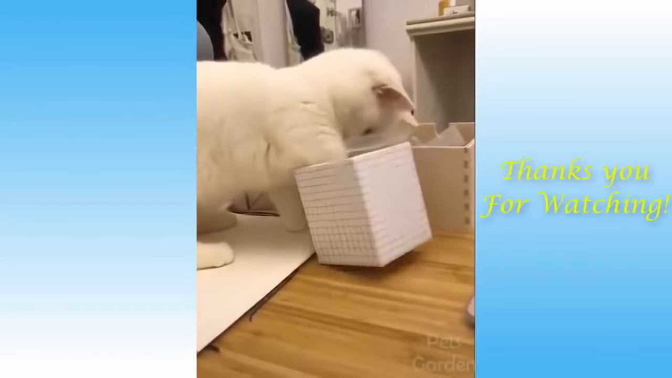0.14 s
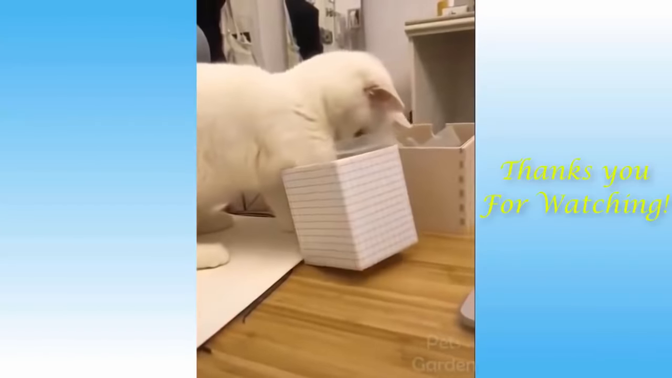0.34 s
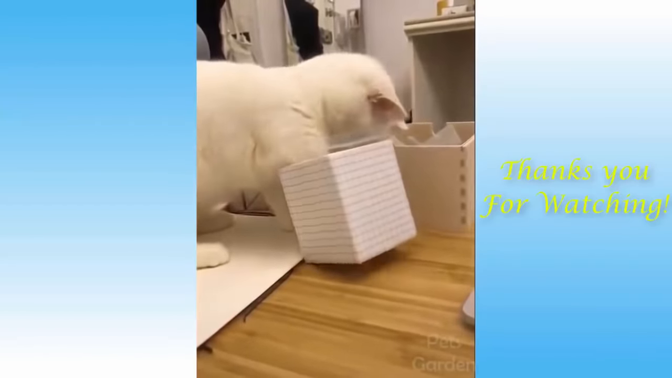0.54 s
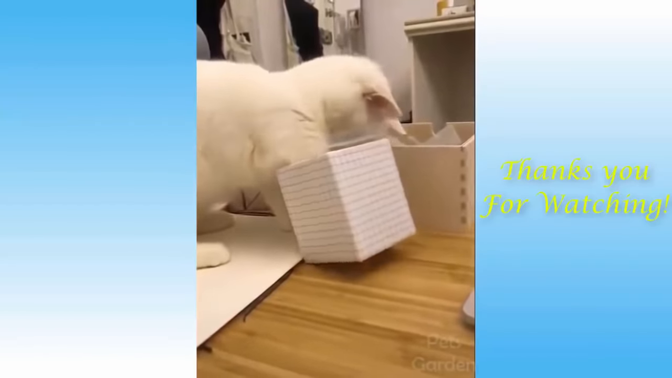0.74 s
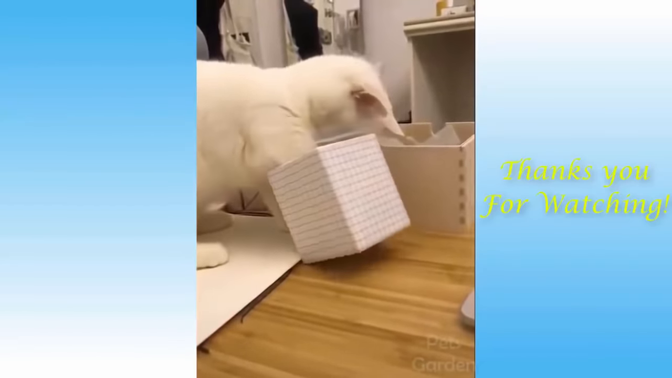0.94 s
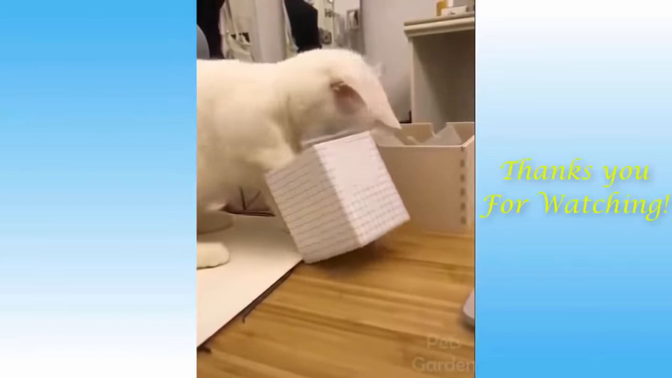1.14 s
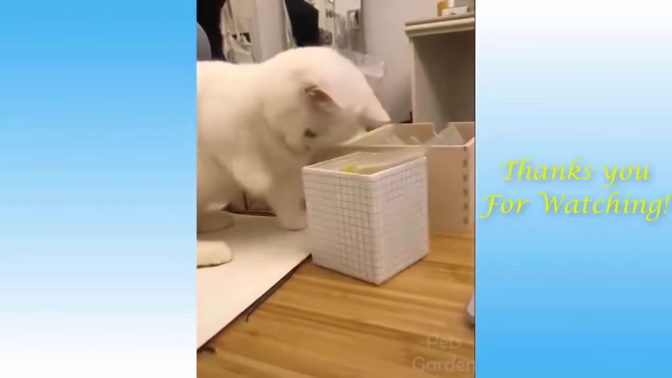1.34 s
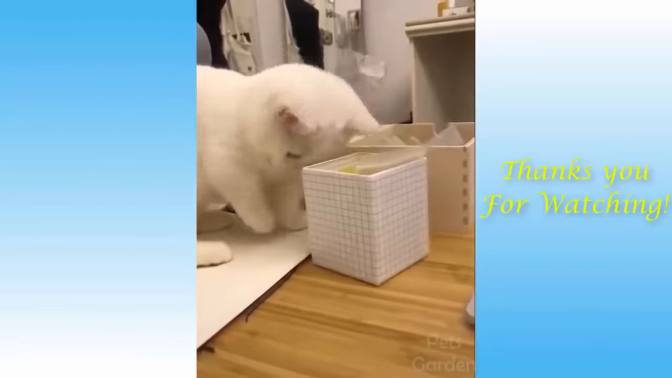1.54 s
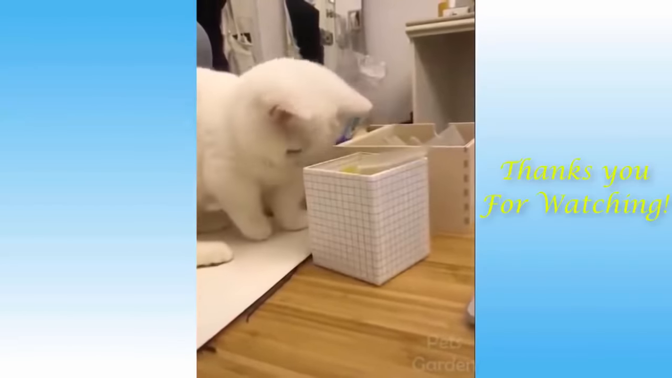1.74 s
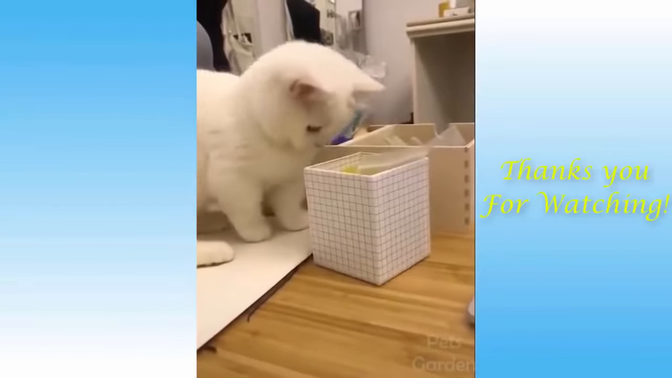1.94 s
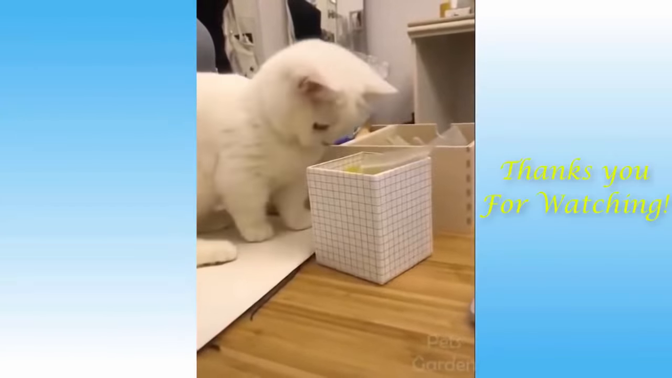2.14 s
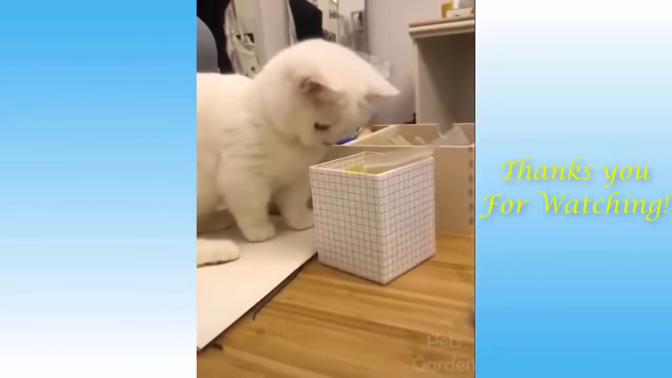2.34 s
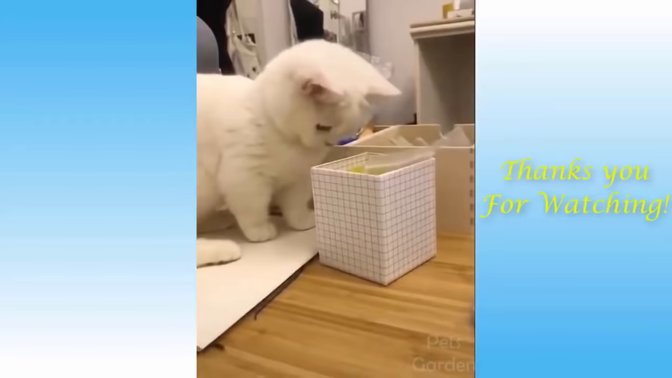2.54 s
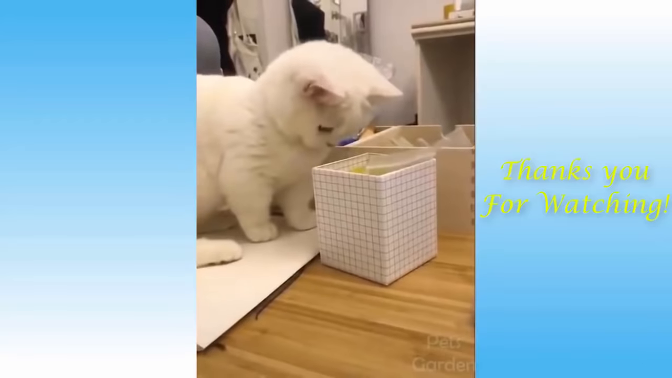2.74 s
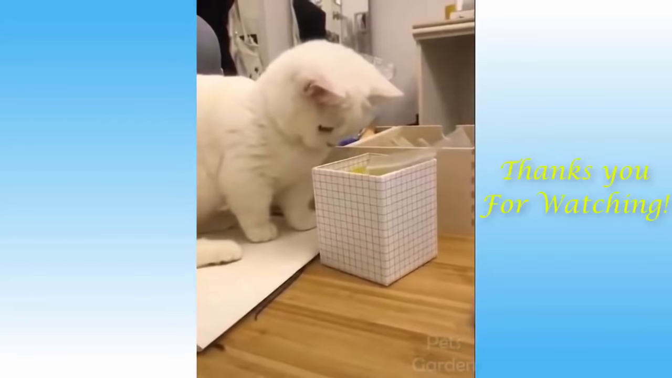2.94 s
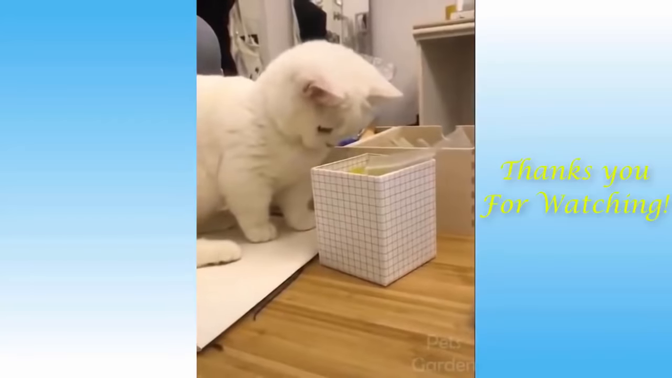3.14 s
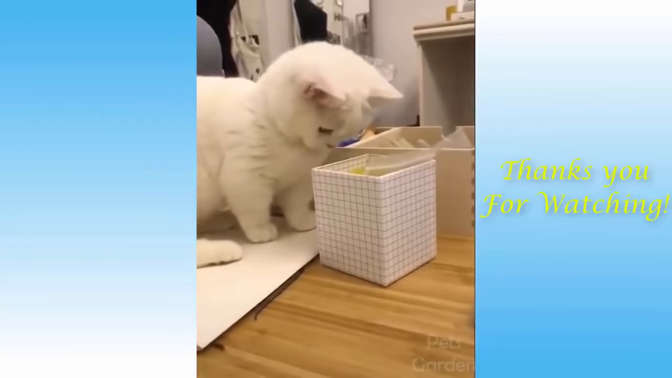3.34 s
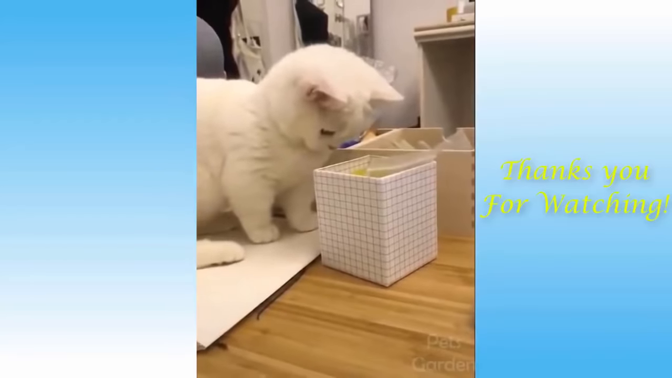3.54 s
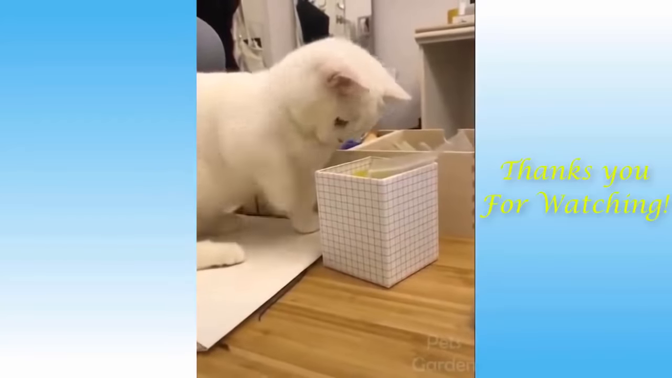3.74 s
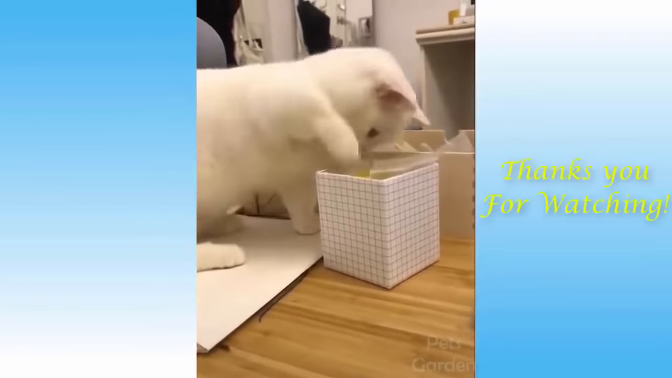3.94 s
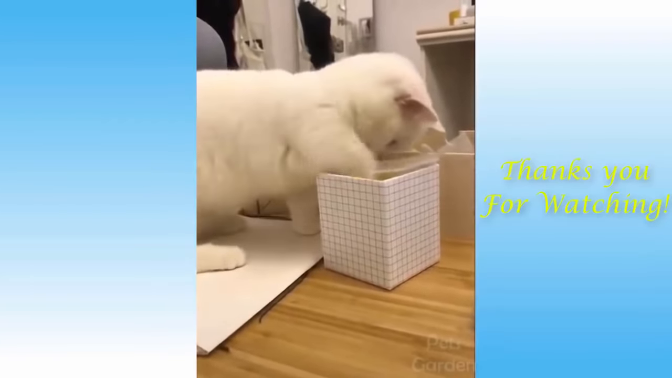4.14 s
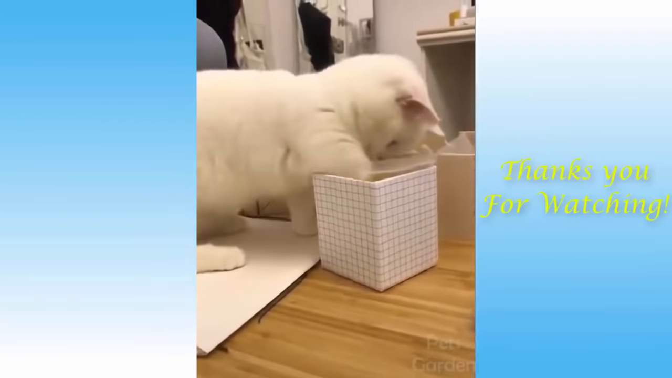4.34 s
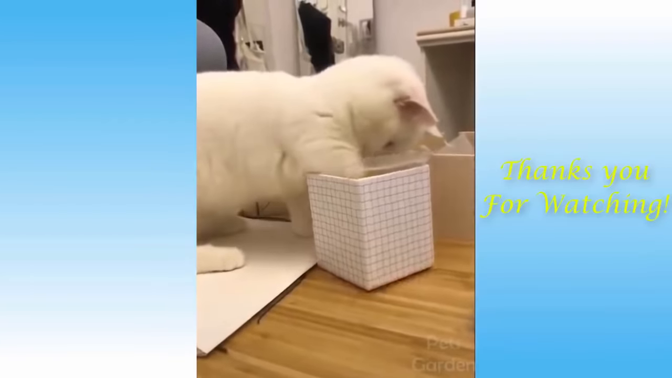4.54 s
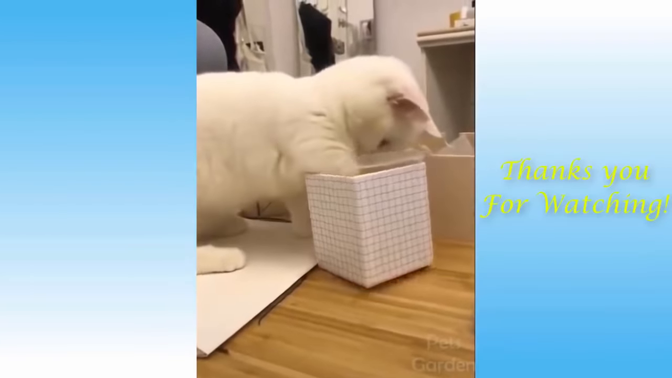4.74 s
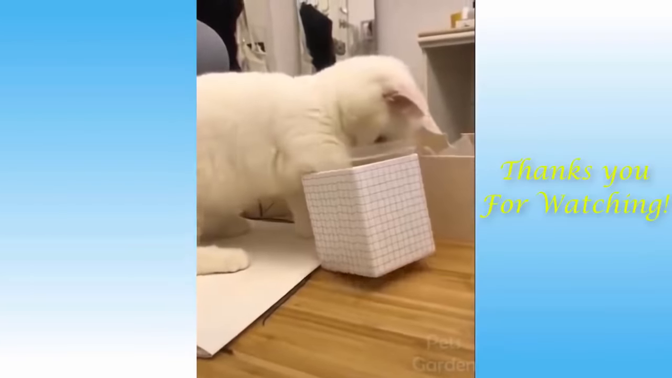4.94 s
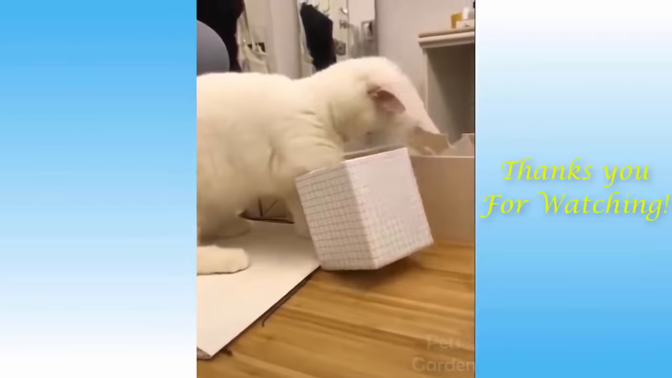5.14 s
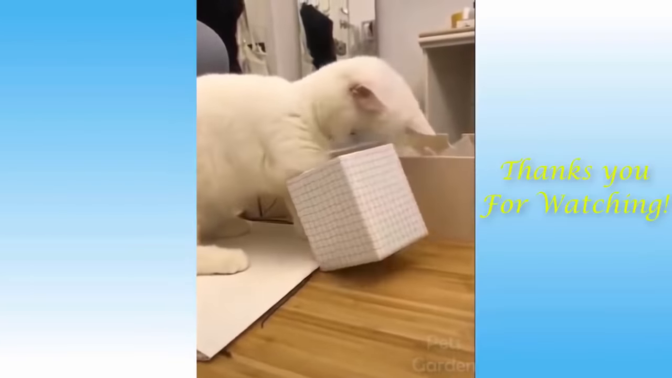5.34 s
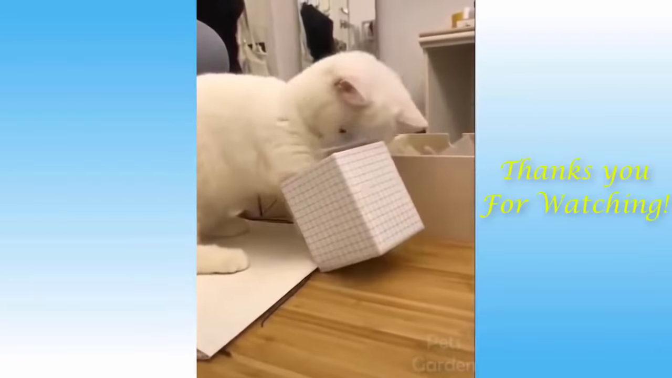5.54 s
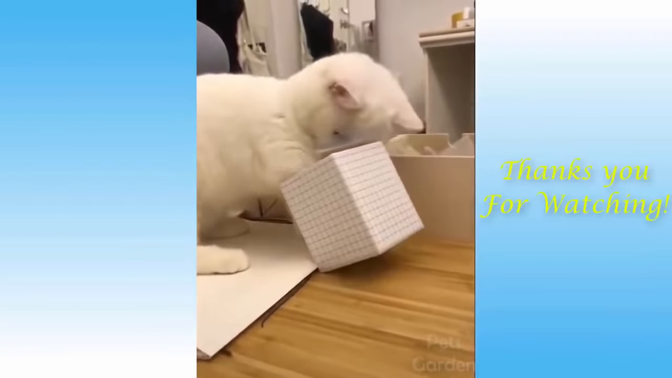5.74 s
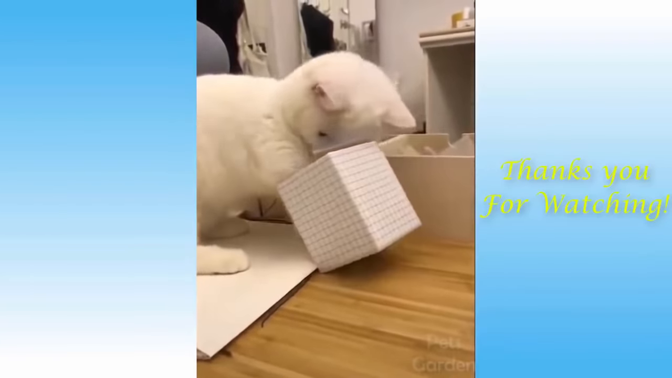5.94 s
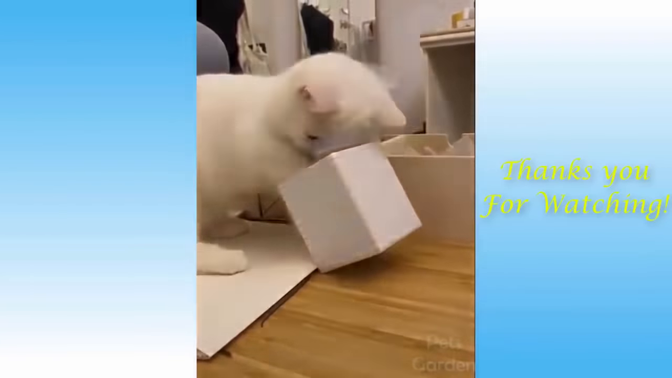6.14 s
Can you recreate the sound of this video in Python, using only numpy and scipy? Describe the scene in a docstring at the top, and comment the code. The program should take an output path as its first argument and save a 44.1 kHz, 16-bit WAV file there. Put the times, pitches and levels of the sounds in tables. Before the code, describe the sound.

A cat's paw scratches inside a small cardboard box, which drops with a knock and a brief rattle, then quiet, then more scraping indoors.

```python
"""Cat in a cardboard box

A cat paws inside a small cardboard box on a wooden table; the tipped box drops back with a knock.
Claws and fur scrape, tick and rasp: noisy forces ring the modes of the card, or glide as narrow noise.
A loose toy rattles inside after the drop; toy and table are struck banks of modes, with a room echo.
A quiet room of banded noise with an appliance hum lies underneath and fades away towards the end."""
import sys
import numpy as np
from scipy import signal
from scipy.io import wavfile

SR = 44100
rng = np.random.default_rng(int(sys.argv[2]) if len(sys.argv) > 2 else 0)


def wrap_up_sound(samples):
    """Save the sound to the file named by the first command line argument, as 16-bit audio."""
    columns = np.atleast_2d(samples).T
    # keep every value between -1 and 1, then stretch to whole-number steps
    tamed = np.clip(columns, -1, 1)
    steps = np.round(tamed * 32767).astype(np.int16)
    wavfile.write(sys.argv[1], SR, steps)


N = 273270


def from_db(db):
    """Gain of a dB value."""
    return 10 ** (np.asarray(db) / 20)


def rms_one(x):
    """Scale to rms 1."""
    return x / np.sqrt(np.mean(x ** 2) + 1e-20)


def in_time(rows):
    """Curve columns, one value per sample."""
    s, *columns = np.transpose(rows)
    return [np.interp(np.arange(N) / SR, s, c) for c in columns]


def drift(rate_hz):
    """Slow random curve of spread 1: noise at SR / 40 through two equal poles at rate_hz."""
    r = np.exp(-2 * np.pi * rate_hz * 40 / SR)
    noise = rng.standard_normal(N // 40 + 2002)
    slow = signal.lfilter([1], [1, -2 * r, r * r], noise)[2000:]  # settled part
    return np.interp(np.arange(N) / 40, np.arange(len(slow)), rms_one(slow))


def band(x, low_hz, high_hz):
    """Band-pass."""
    return signal.sosfilt(signal.butter(2, [low_hz, high_hz], "band", fs=SR, output="sos"), x)


def ring(push, hz, t60_s):
    """A unit click sets a wave of height 1 ringing; small panels radiate nothing far below their pitch."""
    r = from_db(-60 / (t60_s * SR))
    w = 2 * np.pi * hz / SR
    return signal.lfilter([.5, 0, -.5], [1, -2 * r * np.cos(w), r * r], push + 1e-18)


def body(push, modes):
    """All modes of one object, signs alternating."""
    return sum((-1) ** k * from_db(db) * ring(push, hz, t60_s) for k, (hz, db, t60_s) in enumerate(modes))


# Strokes of the paw on the card. Each row: peak in s, relative wall level in dB, swell in s per 20 dB,
# fade in s per 20 dB, hollowness in dB, hollow pitch in Hz, edge in dB, crackle in dB.
PAW_STROKES = [(.03, -45.5, 7, 0.1, -4, 930, -3.5, -5), (0.113, -48.5, 0.1, -0.25, -5, 970, 7, -24.5),
               (.205, -50.5, 0.13, 0.46, -5.5, 870, -1, -18), (.34, -57, 0.4, 0.15, 3, 1150, -24, -16),
               (0.441, -45, 0.07, 0.16, -4, 1240, -5.5, -27), (.55, -51, 0.7, 0.25, 2, 880, -1.5, -9),
               (0.647, -54.5, 0.06, -0.01, 11.5, 1070, 2, 0), (0.741, -54, 0.03, -0.02, 0, 1200, -8, -17),
               (.79, -50.5, -0.15, -0.13, 6, 1450, -2, -1), (0.971, -63.5, 0, 0.02, 9, 760, 11, 7),
               (1.111, -45, -0.0752, -0.02, -4.5, 1300, -1, -12), (1.17, -55, -0.3, -2.3, 7, 1000, 5, -8),
               (1.258, -57, 0.12, 0.16, 10.5, 980, -7, -17),
               (1.328, -61.5, 0.64, 0.43, 1.5, 740, -3.5, -6.5), (1.481, -51, 0, 0.02, 5, 1100, 7, -9),
               (1.547, -45.5, -0.05, 0.1456, 8, 1440, -7, -7.5),
               (1.586, -34.5, 0.0245, 0.1181, 5, 1090, -5.5, -9.5),
               (1.62, -27, 0.0611, 0.05, 3.5, 760, 1, -14),
               (1.642, -32.5, 0.0761, 0.1318, 2.5, 804, -2, -15.5),
               (1.71, -43, 0.25, 0.2, -4, 840, -9, -15.5), (1.85, -44.5, 0.19, 0.19, 0, 1120, -4, -10.5),
               (2.02, -59.5, 0, 0.07, 3, 1178, -7, -32), (2.198, -65, 0.4, 0.32, 7, 1120, 5, -6),
               (2.732, -66.5, 0.4, 0.33, 2.5, 1290, -5.5, -14),
               (3.249, -57.5, -0.03, 0.32, 3.5, 840, -8, -13), (3.999, -57, 0.05, 0, 4.5, 1080, -8.5, -22),
               (4.5, -66.5, -0.0349, -0.5, 13, 593, 6, 11), (4.686, -44, 0.01, 0.16, 9, 1050, -4.5, -10),
               (4.73, -46, 0.0362, -0.06, -7.5, 1100, -8, -17), (4.9, -55, 0.35, -0.6, 0, 1040, -8, -11.5),
               (5.003, -53, 0.01, -0.2, 11, 865, 9, 27), (5.115, -62, 0, 1.4, -6, 1300, 4, 12),
               (5.06, -47.5, 0.18, 0.1, -3, 1110, -6, -13), (5.174, -38, 0.15, 0.23, -3, 1570, -13, -24),
               (5.26, -43, 0.2, 0.08, -9, 1340, -4, -19), (5.442, -47.5, -0.14, 0.38, -4.5, 1505, -11, -22),
               (5.58, -61.5, 0.32, 0.5, -18, 1233, 2, -27), (5.842, -52, -0.36, 0.28, -7, 1004, -7, -16.5),
               (5.99, -61, 0.2, 0.34, 4.5, 910, -1, -18), (6.085, -53, -0.68, 0, -6, 795, -1.5, 8),
               (6.15, -70.5, -2, 0, -11, 710, 0.5, -6)]
# Fur brushing between strokes: relative wall level in dB, hollowness in dB, hollow pitch in Hz,
# edge in dB, crackle in dB.
FUR_REST = (-77, 7.5, 880.5, -6.5, -11)


def strokes():
    """Strokes swell and fade evenly in dB; where they overlap, powers add and colours blend."""
    t = np.arange(N) / SR
    rest_db, *rest_shade = FUR_REST
    total = np.full(N, from_db(rest_db) ** 2)
    colour = total * np.c_[rest_shade]
    for s, level_db, swell_s, fade_s, *shade in PAW_STROKES:
        before = (s - t) / max(swell_s, .003)  # 3 ms at the least
        after = (t - s) / max(fade_s, .003)
        power = from_db(level_db - 20 * np.maximum(before, after)) ** 2
        total = total + power
        colour = colour + power * np.c_[shade]
    return (10 * np.log10(total), *(colour / total))


JUDDER_DB = 3  # rms of the stick-slip lumps


def scraping(level_db, *colour):
    """Dense uneven slips in clumps, over the fine hiss of fur."""
    sizes = from_db(1.8 * np.minimum(rng.exponential(1, N), 4)) * rng.choice([-1, 1], N)
    slips_per_s = 600 * from_db(5 * drift(40))
    slips = rms_one(sizes * (rng.random(N) < slips_per_s / SR))
    force = from_db(-3) * slips + from_db(-5) * rng.standard_normal(N)
    lumps_db = 1.3 * drift(41) + JUDDER_DB * drift(110)
    return box(force * from_db(level_db + lumps_db - 1.5), *colour)


# Claw ticks and paper snaps. Each row: start in s, force level in dB, hollowness in dB, edge in dB,
# crackle in dB.
CLAW_TICKS = [(0.021, -53, -18, 5, 2), (0.0325, -31, -13.5, -0.5, -2), (0.099, -30, -27, -1.5, -22),
              (0.1078, -37.5, -20, 3.5, -24), (.1955, -35, -5, -7, -31), (0.2156, -26.5, 5, -6, -8.5),
              (.241, -28, -30, -1, -21), (0.392, -39.5, -1, -6.5, -35), (.4389, -45.5, -9.5, 7, 0),
              (0.455, -43, -18, -3, -25), (0.466, -32.5, 1.5, -4, -9.5), (0.564, -41, -7, 3.5, -20),
              (.576, -46, -16, -2, -22), (.601, -41, -9, -4.5, -24), (0.6085, -38, 4, -2, -22),
              (0.6308, -34, -14, 2.5, -26), (.738, -47, -12, -6, -18), (0.768, -46, -6, 1, -14),
              (0.9597, -31.5, -15, -5.5, -12), (1.107, -35.5, 0, -11, -30), (1.1231, -32, 2.5, -5, -20),
              (1.1777, -27, -14, -2.5, -20), (1.4157, -43, -8, 1.5, -18), (1.4316, -43.5, -14, 4, -8),
              (1.444, -44.5, -7, 0, -12), (1.466, -44, -8, 2, -17), (1.484, -36, -10, -7, -32),
              (1.4996, -37, -11, 7, -19), (1.516, -32, -20, 9, -19), (1.5457, -30, -19, -6, -34),
              (1.5605, -50, -8, -3, -18), (1.5782, -15, 6, -4.5, -16), (1.6057, -18, -16, -15, -26),
              (1.6228, -17.5, -13.5, -2.5, -21), (1.6258, -24.5, -12.5, 4, -22.5),
              (1.6324, -21, -4, -10, -21.5), (1.652, -31, -12, -4, -25.5), (1.6614, -17, -9, -10, -28),
              (1.686, -26, -18, -3.5, -27), (1.707, -21, -5, -16, -39), (1.719, -26, -14, -10, -28),
              (1.7385, -37, -11, -11, -28), (2.7278, -53.5, -10.5, 6.5, -9), (3.24, -49, -3, -7, -24),
              (3.99, -50, -1, -9, -21), (4.657, -44.5, -13, 2, -19), (4.6748, -20, -8, -16, -18),
              (4.691, -30, -13, -17, -10), (4.6978, -27, -23.5, -20, -30), (4.7351, -49, -10, -9, -23),
              (4.7551, -33, -19, -16, -17), (4.772, -44, -2, -12, -24), (4.779, -47, 0, -8, -26),
              (4.874, -40, -2, -7, -19), (5.0012, -45.5, 2.5, -7, 15), (5.033, -45.5, -16, 4, -12),
              (5.045, -40, -4, -9, -17), (5.054, -42, -17, -4, -18), (5.1166, -41, -15, 4.5, -5),
              (5.1846, -30, -5, -23, -30), (5.1967, -23.5, -8, -11, -29), (5.2062, -36, -18, -2, -22),
              (5.2214, -26, -11, 1.5, -19), (5.244, -31.5, -2, -13, -15), (5.2869, -34.5, -17, -4, -14.5),
              (5.354, -45, -10.5, -2.5, -11), (5.4369, -29, -2, -9.5, -24.5), (5.488, -45, 3, 0, -24),
              (5.5263, -45, -7, -3, -29), (5.5825, -40.5, -15.5, -5, -35), (5.834, -38.5, -8.5, -1, -16),
              (5.8437, -34, -13.5, -1.5, -21), (5.860, -44, -18, -2, -8), (5.8713, -36, -2, -7, -29),
              (5.9276, -38, -8, 2, -7.5), (5.9691, -31.5, -3, -7, -20), (5.9793, -43.5, -17, 5.5, -9),
              (6.0135, -36.5, -9, -6, -15), (6.0678, -27.5, -13.5, -6.5, -23), (6.0846, -46, -12, 2, 9),
              (6.106, -52, -17, 7.5, -4)]


def ticks(hollow_hz):
    """Each tick is a sharp snap and a short dying burst of force, with a colour of its own."""
    force, colour = np.zeros(N), np.zeros((3, N))
    age_s = np.arange(400) / SR
    fade = np.exp(-age_s / 0.0011)
    fade_rms = np.sqrt(np.mean(fade ** 2))
    noise = rng.standard_normal((len(CLAW_TICKS), len(age_s)))
    for (s, level_db, *shares_db), grain in zip(CLAW_TICKS, noise):
        start = round(s * SR)
        i = slice(start, start + len(age_s))
        burst = rms_one(grain * fade) * fade_rms
        snap = 1.3 * (age_s == 0)
        force[i] += from_db(level_db) * (burst + snap)
        colour[:, i] = np.c_[shares_db]
    hollow_db, edge_db, crackle_db = colour
    return box(force, hollow_db, hollow_hz, edge_db, crackle_db)


# A claw or the box edge drags and sings in a narrow band. Each row: start in s, length in s,
# relative level in dB, first pitch in Hz, last pitch in Hz.
DRAGS = [(0.387, 0.092, -48, 1297, 1270), (0.401, .16, -56, 2295, 2200), (1.102, 0.02, -49.5, 1500, 1250),
         (1.131, 0.024, -53.5, 3800, 3200), (1.247, 0.027, -53.5, 2475, 1500),
         (1.286, 0.052, -54, 810, 700), (1.29, .04, -80, 1950, 2350), (1.292, 0.056, -62, 4000, 3800),
         (2.146, 0.162, -65.5, 3000, 2950), (2.158, 0.097, -66, 5400, 5300),
         (3.984, 0.064, -58.5, 1650, 1710), (5.126, .21, -50, 2130, 2550)]
RASP_POLE_WIDTH_HZ, RASP_WAVER = 160, 0.032  # width of each of two poles, rms share of first pitch


def rasps():
    """Narrow noise that glides with the drag, swelling and fading within it."""
    out = np.zeros(N)
    r = np.exp(-np.pi * RASP_POLE_WIDTH_HZ / SR)
    waver_s = RASP_WAVER * np.cumsum(drift(40)) / SR
    wobble = rms_one(signal.lfilter([1], [1, -2 * r, r * r], rng.standard_normal((2, N))))
    for s, length_s, level_db, first_hz, last_hz in DRAGS:
        along = np.linspace(0, 1, round(length_s * SR))
        start = round(s * SR)
        i = slice(start, start + len(along))
        glide_hz = first_hz * (last_hz / first_hz) ** along
        turn = 2 * np.pi * (np.cumsum(glide_hz) / SR + waver_s[i] * first_hz)
        swell = np.sin(np.pi * along).clip(0) ** .3
        narrow = wobble[0, i] * np.cos(turn) + wobble[1, i] * np.sin(turn)
        out[i] += from_db(level_db) * swell * narrow
    return out * from_db(JUDDER_DB * drift(90) - 1.0)


# Modes of the hollow, the walls and the stiff edges.
# Each row: pitch in Hz, relative level in dB, t60 in s.
HOLLOW_MODES = [(604, -1, 0.024), (786, -4.5, 0.011), (946, -6, 0.019), (1120, -10.5, 0.022),
                (1290, -3, 0.022), (1500, -1.5, 0.015)]
WALL_MODES = [(2027, -3, 0.014), (2220, -5.5, 0.015), (2450, -2, 0.009), (2773, -2.5, 0.011),
              (2950, 0.5, 0.0068)]
EDGE_MODES = [(3725, 2, 0.0056), (4365, 0.66, 0.0061), (4710, 0, 0.0036), (5800, -2, 0.0023),
              (6340, -7.5, 0.0057)]
# The part of the wall that the paw leaves free. Each row: time in s, loudest pitch in Hz.
FREE_WALL = [(0, 2560), (.2, 2160), (.6, 2300), (1.1, 2420), (1.6, 2350), (2.2, 2820), (3.2, 2310),
             (4.65, 2165), (5.0, 2600), (5.17, 2100), (5.32, 2520), (5.6, 2720), (5.9, 2294), (6.2, 2180)]


def box(push, hollow_db, hollow_hz, edge_db, crackle_db):
    """One contact force drives the card walls, the hollow of the box, its stiff edges and a dry crackle."""
    hollow = 0
    for hz, db, t60_s in HOLLOW_MODES:  # the paw reshapes the cavity: modes near its pitch speak loudest
        off_pitch_db = 20.9 * np.log2(hz / hollow_hz) ** 2
        hollow = hollow + ring(push * from_db(hollow_db + db - 19 - off_pitch_db), hz, t60_s)
    hollow = band(hollow, 310, 1800)

    walls = 0
    wall_hz, = in_time(FREE_WALL)
    for k, (hz, db, t60_s) in enumerate(WALL_MODES):
        off_pitch_db = 32 * np.log2(hz / wall_hz) ** 2
        walls = walls + (-1) ** k * ring(push * from_db(db - 14.5 - off_pitch_db), hz, t60_s)
    walls = band(walls, 1800, 3200)

    edges = from_db(-13) * band(body(push * from_db(edge_db), EDGE_MODES), 3900, 7300)

    # the paper skin crackles on for a moment
    grit = rng.standard_normal(400) * np.exp(-np.arange(400) / SR / .002)
    crackle = signal.fftconvolve(push * from_db(crackle_db), grit / np.linalg.norm(grit))[:N]
    crackle = from_db(6.5) * band(band(crackle, 4800, 13800), 7000, 12000)
    return hollow + walls + edges + crackle


# The toy bounces in the box. Each row: start in s, relative level in dB, hardness in dB per octave.
TOY_BOUNCES = [(1.783, -20.5, 1.5), (1.798, -26, -2), (1.846, -20.5, 3.5), (1.855, -34, 7.5),
               (1.888, -21, -1), (1.902, -47, -2), (1.962, -35.5, -2), (1.967, -38.5, -6), (2.013, -47, 4),
               (2.029, -38, -4.5), (2.079, -28.5, -6.5), (2.094, -34, -7), (2.483, -38.5, -8)]
# Each row: pitch in Hz, relative level in dB, t60 in s.
TOY_MODES = [(862, -6.5, 0.021), (1150, -6, 0.006), (1750, -2, 0.014), (2350, -5.5, 0.0041),
             (2900, -6.5, 0.012), (3850, -1.5, 0.022), (5000, -10, 0.0054), (6040, -13, 0.0092)]


def toy():
    """A small hard toy rattles in the box: brief rough contacts ring its modes."""
    return strike(TOY_BOUNCES, TOY_MODES, contact_s=.00008, rough=0.65, spread_db=3.0, gain_db=-3.5,
                  pivot_hz=1737)


# Box bottom on the table. Each row: start in s, relative level in dB, hardness in dB per octave.
BOX_KNOCKS = [(1.5782, -9.5, 1), (1.6007, -19.5, 2.5), (.29, -42, -6), (0.558, -45, -7), (3.3, -47, -12.5),
              (5.82, -50, -5.5)]
# Each row: pitch in Hz, relative level in dB, t60 in s.
TABLE_MODES = [(66, -21, 0.28), (128, -15.5, 0.069), (189.6, -1.5, 0.092), (198.8, -13.5, 0.33),
               (288.5, -12.5, 0.076), (356, -6, 0.064), (490, -7.5, 0.04), (545, -8.5, 0.059),
               (620, -8, 0.088), (743, -12.5, 0.1), (846, -15.5, 0.13), (958, -4, 0.054), (1187, -9, 0.047),
               (1692, -8.5, 0.023)]


def knocks():
    """The flat bottom meets the table top softly; both ring."""
    return strike(BOX_KNOCKS, TABLE_MODES, contact_s=0.00024, rough=0.26, spread_db=2.16, gain_db=3.0,
                  pivot_hz=200)


def strike(blows, modes, contact_s, rough, spread_db, gain_db, pivot_hz):
    """Rough contacts strike each mode with a strength of its own; hard ones favour high modes."""
    s, level_db, hardness = np.transpose(blows)
    luck_db = rng.normal(0, spread_db, (len(s), len(modes)))
    age_s = np.arange(150) / SR
    grain = 1 + rough * rng.standard_normal((len(s), len(age_s)))
    skids = grain * np.exp(-age_s / contact_s) / (contact_s * SR)
    energy = np.linalg.norm(skids, axis=1, keepdims=True)
    skids *= energy.mean() / energy  # equal energy for every contact
    at = np.round(s * SR).astype(int)[:, None] + np.arange(len(age_s))
    out = 0
    for k, (hz, db, t60_s) in enumerate(modes):
        force = np.zeros(N)
        tilt_db = hardness * np.log2(hz / pivot_hz)
        blow_db = level_db + db + gain_db + tilt_db + luck_db[:, k]
        force[at] = skids * from_db(blow_db)[:, None]
        out = out + (-1) ** k * ring(force, hz, t60_s)
    return out


ROOM_T60_S, WALL_CUT_HZ, ROOM_DB = 0.47, 3850, -18.5  # low-pitch decay, low-pass per round, send gain


def room(x):
    """Ten feedback delays, duller on every round."""
    out = np.zeros(N)
    dull = np.exp(-2 * np.pi * WALL_CUT_HZ / SR)
    lags = (np.geomspace(.011, .037, 10) * SR).astype(int)
    for k, lag in enumerate(lags):
        loop, state = x.copy(), [0.]
        gain = from_db(-60 * lag / SR / ROOM_T60_S)
        for i in range(lag, N, lag):
            back, state = signal.lfilter([gain * (1 - dull)], [1, -dull], loop[i - lag:i], zi=state)
            loop[i:i + lag] += back[:N - i]
        out += (loop - x) * (-1) ** k
    return out


# Spectrum of the quiet room. Each row: frequency in Hz, relative density in dB.
ROOM_SPECTRUM = [(22, -6.5), (45, -1.5), (70, -9.5), (100, -14.5), (180, -15.5), (300, -18.5), (460, -29),
                 (700, -26.5), (1000, -24.5), (1450, -32.5), (1750, -34.5), (2300, -42), (4000, -43),
                 (7500, -45), (10000, -53.5), (12800, -44), (13600, -63.5)]
# The background fades. Each row: time in s, level in dB.
BACKGROUND_FADE = [(0, -53), (3.7, -54), (4.5, -56.5), (5.2, -58.5), (5.7, -62.5), (6.2, -67.5)]


def room_tone():
    """Third-octave bands of noise that flicker slightly."""
    hz, db = np.transpose(ROOM_SPECTRUM)
    edges_hz = 18 * 2 ** np.arange(0, 10, 1 / 3)
    white = rng.standard_normal((2, N))  # neighbouring bands take different noise
    out = 0
    for k, (low_hz, high_hz) in enumerate(zip(edges_hz, edges_hz[1:])):
        level_db = np.interp(np.log(low_hz * high_hz) / 2, np.log(hz), db)
        out = out + from_db(level_db + drift(23.0)) * band(white[k % 2], low_hz, high_hz)
    return rms_one(out) * from_db(in_time(BACKGROUND_FADE)[0])


# Appliance hum: pitch in Hz, offset from the room tone in dB, before the level of each multiple.
HUM_LINE = (135.1, 2.8)
# Each row: multiple of the pitch, relative level in dB.
HUM_MULTIPLES = [(1, -3), (2, -23.5), (4, -24.5)]


def hum():
    """A motor line with faint multiples, wavering a little in level."""
    pitch_hz, offset_db = HUM_LINE
    turn = 2 * np.pi * pitch_hz * np.arange(N) / SR
    lines = sum(from_db(db) * np.sin(k * turn) for k, db in HUM_MULTIPLES)
    level_db = in_time(BACKGROUND_FADE)[0] + offset_db + .8 * drift(11)
    return np.sqrt(2) * from_db(level_db) * lines


def scene():
    """Box sounds with their room, over the fading background."""
    level_db, hollow_db, hollow_hz, edge_db, crackle_db = strokes()
    near = scraping(level_db, hollow_db, hollow_hz, edge_db, crackle_db)
    near = near + ticks(hollow_hz) + rasps() + toy() + knocks()
    return (near + from_db(ROOM_DB) * room(near) + room_tone() + hum())[None]


CUTOFF_HZ = 14900  # 60 dB down from here up


def record(dry):
    """A steep low-pass cuts the top."""
    return signal.sosfilt(signal.cheby2(12, 60, CUTOFF_HZ, fs=SR, output="sos"), dry)


dry = scene()
out = record(dry)
wrap_up_sound(out)
```